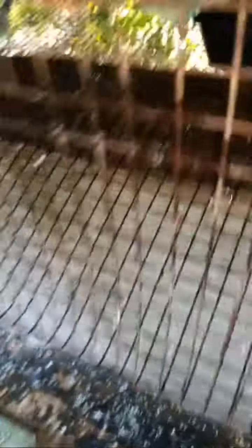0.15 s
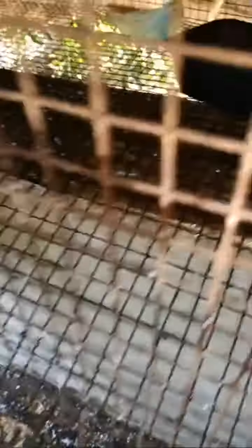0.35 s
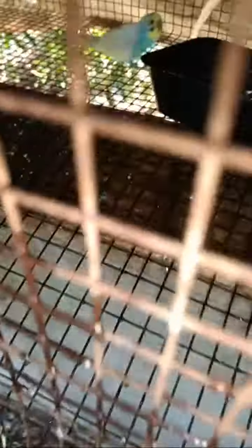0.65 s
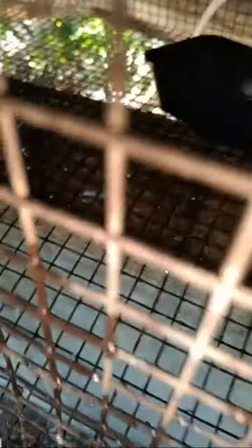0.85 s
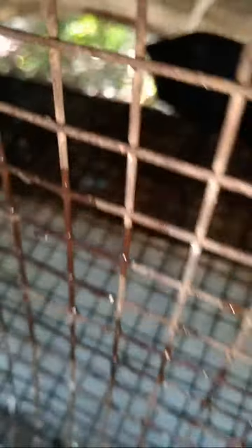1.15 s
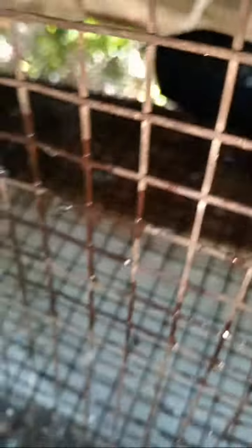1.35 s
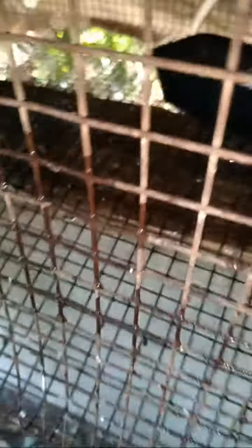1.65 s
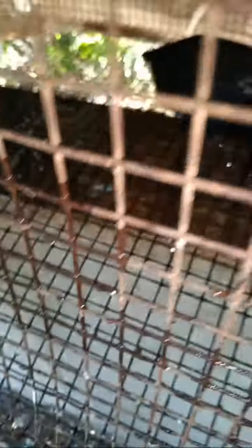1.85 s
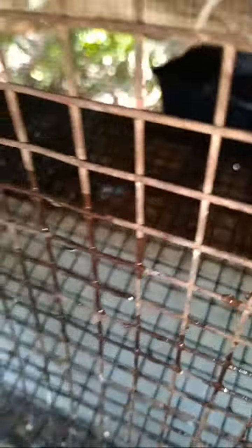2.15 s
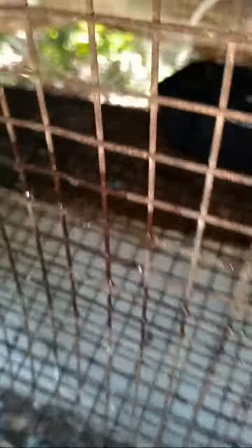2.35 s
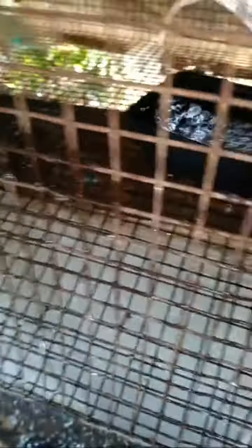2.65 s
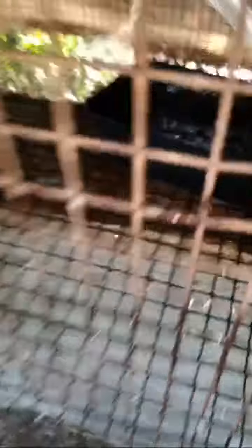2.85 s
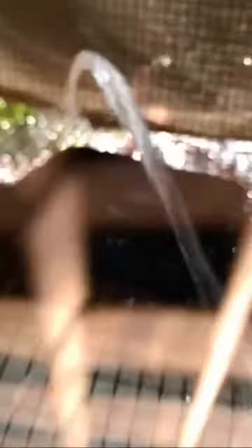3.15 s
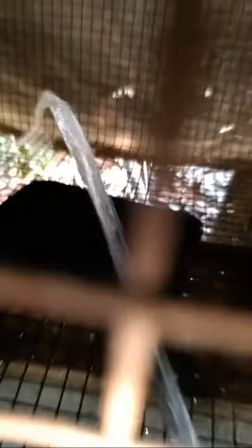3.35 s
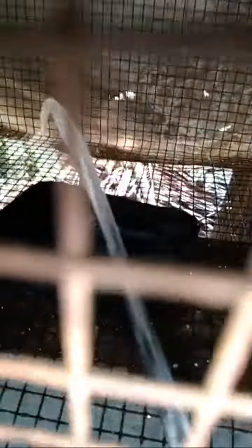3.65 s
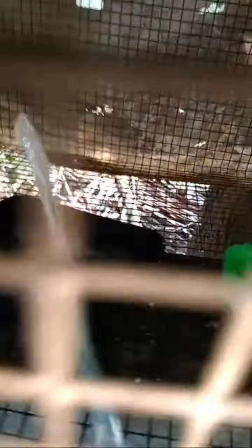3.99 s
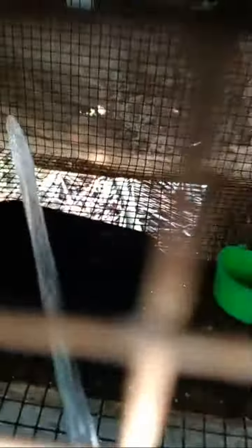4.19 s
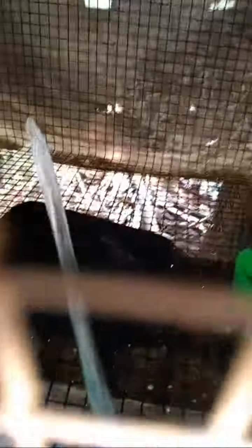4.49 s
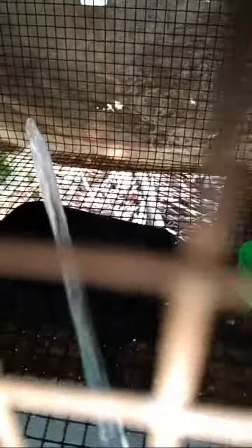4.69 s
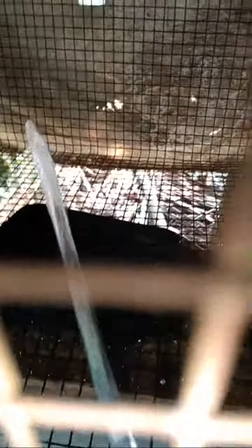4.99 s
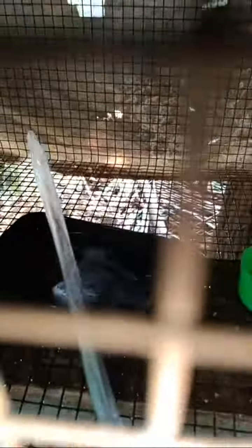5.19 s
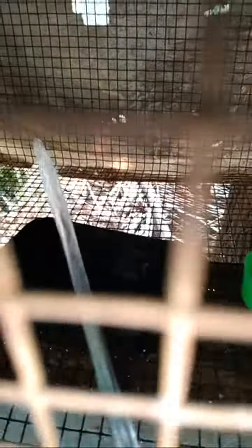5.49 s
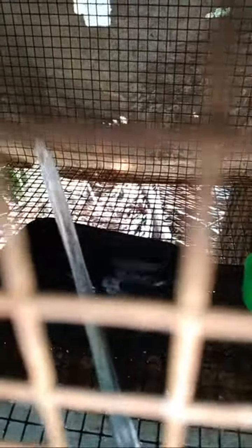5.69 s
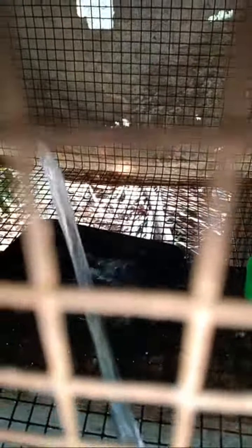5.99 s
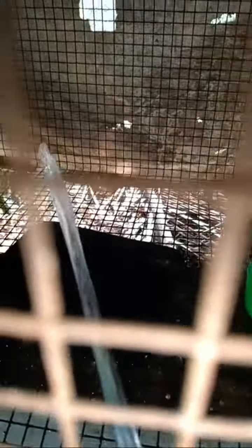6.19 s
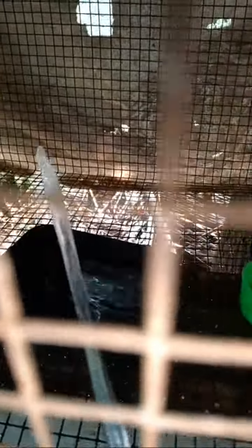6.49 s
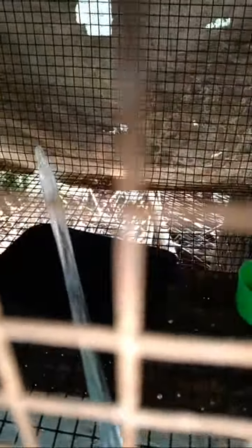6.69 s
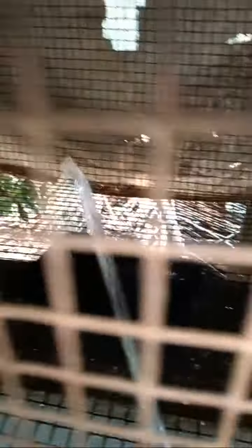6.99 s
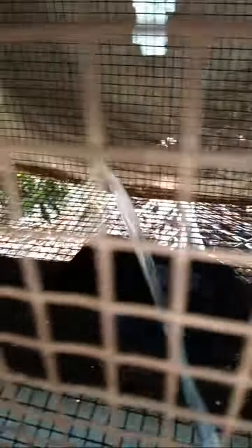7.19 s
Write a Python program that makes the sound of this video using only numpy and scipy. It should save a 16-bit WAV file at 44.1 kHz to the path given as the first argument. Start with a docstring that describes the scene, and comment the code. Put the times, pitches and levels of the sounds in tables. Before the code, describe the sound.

A small wire aviary full of budgerigars. A farther flock warbles continuously in tiny overlapping glides, while close birds whistle short bright chirps and rasp dryly. Water patters and drums quietly beneath, much softer than the birds. Soft cage bumps come around two seconds, a sharper knock just before five. Chirping bursts near one, two and a half and three and a half seconds. Handheld close microphone, short dense reflections, brief tiny dropouts.

```python
"""Farther budgerigars warble without a pause; over them near birds whistle quick glides and scold in dry rasps.
All share a small wire aviary, and a jet of water runs into it, pattering and drumming on tray and tub. Whistles
are pitch-gliding tones, rasps are noise snaps through moving throat resonances. Water is filtered random clicks
plus ringing bubbles; dull thumps are decaying band noise. A faint hum and dry ticks lie underneath; the level
dips for a few milliseconds now and then."""
import sys
import numpy as np
from scipy import signal
from scipy.fft import rfft, irfft, next_fast_len
from scipy.io import wavfile
from scipy.ndimage import uniform_filter1d

SR = 44100
rng = np.random.default_rng(int(sys.argv[2]) if len(sys.argv) > 2 else 0)


def store_wav(level_fs):
    """Save 16-bit WAV to argv[1]."""
    pcm = np.round(np.clip(np.atleast_2d(level_fs), -1, 1) * 32767)
    wavfile.write(sys.argv[1], SR, pcm.T.astype(np.int16))


N = 323694
TIME = np.arange(N) / SR

# Levels in the tables are source settings, ahead of the gains and filters in the functions.
# faint hum: (time [s], level [dB])
HUM_LEVEL = [(0, -61), (.8, -72), (1.3, -63.5), (2.5, -61), (2.7, -101), (7.34, -79.5)]
# sharp ticks: (time [s], level [dB])
TICKS = [(0.771, -29.5), (2.577, -23.5), (3.172, -38), (3.22, -33.5), (3.455, -32), (3.891, -37),
         (3.916, -38), (5.81, -30.5), (6.466, -33)]
# running water: (time [s], drumming level [dB], patter level [dB])
WATER_LEVELS = [(0.0, -63.5, -59), (1.14, -62.5, -60), (1.35, -59, -55.5), (2.25, -51, -53.5),
                (2.41, -53.5, -54), (2.57, -61, -61), (2.88, -78.5, -65.5), (3.27, -68, -64.5),
                (3.66, -78, -65.5), (4.05, -70.5, -65), (4.52, -77.5, -67), (4.78, -68.5, -56.5),
                (5.23, -75, -63), (5.64, -63, -54), (5.99, -78, -68), (7.05, -69.5, -60),
                (7.22, -59.5, -56.5), (7.34, -60, -55)]
# gushes, the jet landing more heavily: (time of peak [s], half length to 1/e of the extra dB [s], extra [dB])
GUSHES = [(3.3, 0.21, 5), (4.552, 0.045, 13), (4.707, 0.03, 13), (5.323, 0.053, 9), (6.698, 0.045, 6.5)]
# dull low thumps, some of them the jet drumming harder on the tub: (time [s], level [dB], rise constant [s],
# t60 [s], lowest [Hz], highest [Hz])
BUMPS = [(.3, -53, .03, 0.44, 60, 200), (1.91, -35, 0.026, 0.42, 90, 430),
         (2.248, -33, 0.016, 0.23, 100, 286), (2.574, -37, 0.0026, 0.02, 30, 3000),
         (3.249, -49, 0.014, 0.23, 60, 170), (4.038, -59.5, 0.04, 1, 80, 200),
         (4.539, -47, 0.043, 0.63, 70, 180), (4.815, -32, 0.001, 0.38, 190, 4000),
         (4.821, -41, 0.0025, 0.49, 167, 238), (6.68, -58, .03, 0.48, 105, 180)]
# farther birds together: (time [s], level [dB], reference pitch [Hz])
FLOCK_CURVE = [(0.0, -38.5, 3230), (0.57, -36, 3473), (1.35, -40, 3226), (2.0, -38, 3460),
               (2.27, -44, 3183), (3.37, -37, 3160), (3.45, -33, 4080), (3.7, -31, 3069), (4.33, -34, 3463),
               (4.46, -39.5, 2630), (4.78, -32.5, 3483), (4.97, -41, 4010), (5.01, -41.5, 2731),
               (5.74, -35.5, 2436), (5.83, -32, 3610), (6.07, -32.5, 2573), (6.54, -36, 3125),
               (6.85, -28, 3365), (7.07, -44.5, 2804), (7.34, -41, 3955)]
# scolding rasps: (time [s], length [s], throat resonance [Hz], its level [dB], shrill level [dB])
RASPS = [(0.019, .1, 4660, -49, -55.5), (0.237, 0.014, 4220, -45, -60), (1.144, 0.076, 4170, -46.5, -60),
         (1.639, 0.058, 5350, -49, -60), (1.825, 0.084, 3780, -33.5, -47), (1.977, .11, 3950, -37.5, -42.5),
         (2.158, 0.053, 3660, -35, -50), (2.22, 0.019, 4400, -29.5, -48), (2.984, 0.048, 3640, -44, -57),
         (3.276, 0.064, 4300, -47, -58), (3.488, 0.041, 3770, -42, -44.5), (4.005, 0.096, 3220, -39, -45),
         (4.108, 0.042, 3860, -59, -43), (4.207, 0.098, 3330, -32, -46), (4.728, 0.05, 3560, -28, -33),
         (4.857, 0.05, 4170, -28, -43.5), (4.919, .028, 4150, -25, -38), (5.312, 0.15, 3260, -50, -56),
         (6.729, 0.085, 3600, -32.5, -50), (6.895, .069, 3430, -37, -37.5),
         (7.002, 0.034, 4070, -37.5, -52), (7.2, 0.037, 3250, -42.5, -44)]
# throat modes of a rasp: (multiple of the resonance [ratio], nominal width [Hz], level [dB])
THROAT_MODES = [(.62, 420, -5), (.84, 503, -1.5), (1.018, 520, 2), (1.17, 610, -11)]
# shrill modes of a rasp: (centre [Hz], nominal width [Hz], level [dB])
SHRILL_MODES = [(5880, 1700, -7.5), (6820, 210, 6), (8410, 630, -5), (9700, 620, -22.5)]
# near whistled syllables: (time [s], length [s], pitch [Hz], glide [octaves], level [dB])
CHIRPS = [(0.103, 0.04, 3300, -.6, -35), (0.266, 0.081, 3588, 0.07, -29), (0.333, 0.049, 3250, -.45, -38),
          (0.437, 0.031, 3710, -0.21, -30.5), (.46, 0.067, 2650, -0.32, -37.5),
          (0.527, 0.055, 2920, 0.12, -35), (0.572, 0.067, 3600, -.05, -29),
          (0.708, 0.035, 3860, -0.28, -33.5), (.759, 0.037, 3040, -0.47, -25),
          (.803, 0.039, 2797, 0.56, -28), (0.927, 0.024, 4620, 0.29, -23.5),
          (0.949, 0.017, 3780, -0.22, -17.5), (0.973, 0.017, 2810, -0.5, -22.5),
          (1.003, 0.027, 3633, -0.15, -13.5), (1.028, 0.015, 3950, 0.28, -21.5),
          (1.039, .014, 2600, -1.55, -30.5), (1.331, 0.022, 3380, 0, -38.5),
          (1.479, 0.034, 3375, 0.12, -30.5), (1.557, 0.04, 3292, -0.026, -26),
          (1.591, 0.029, 2890, 0.37, -37.5), (1.803, 0.012, 3887, -0.028, -26.5),
          (1.935, 0.02, 2950, -.4, -32.5), (1.97, 0.071, 3530, 0.58, -30),
          (2.226, 0.045, 1880, -0.025, -39.5), (2.248, 0.076, 4000, .25, -41),
          (2.497, 0.037, 3150, -0.09, -36.5), (2.532, .02, 3282, 0, -22.5),
          (2.559, 0.017, 4400, 0.44, -27.5), (2.574, 0.036, 3150, -1.2, -21.5),
          (2.596, 0.025, 3230, 0.23, -21.5), (2.624, 0.031, 3637, 0.045, -15.5),
          (2.653, 0.017, 2700, -1.4, -26), (2.742, 0.11, 2580, -0.59, -40), (2.9, 0.055, 3320, 0.8, -37),
          (2.96, 0.019, 3506, -0.057, -24.5), (3.092, 0.042, 4520, -0.026, -35),
          (3.148, 0.058, 2975, -1.05, -33), (3.216, 0.023, 2586, 0.51, -32.5),
          (3.317, 0.047, 3155, -0.13, -37), (3.453, 0.013, 4600, 0.61, -23),
          (3.46, 0.046, 3594, -0.82, -19.5), (3.462, 0.036, 3793, -0.091, -18.5),
          (3.513, 0.016, 3790, 0, -16.5), (3.514, 0.025, 2170, 0.042, -27.5),
          (3.535, 0.0068, 3755, 0.21, -10.5), (3.55, 0.041, 3970, -0.2, -20.5),
          (3.557, 0.036, 3190, 0.36, -21.5), (3.579, 0.022, 3580, 0, -16), (3.58, .12, 2200, 0.008, -36.5),
          (3.603, .02, 3960, -.05, -14), (3.628, 0.036, 3790, -0.14, -23), (3.665, .087, 3140, 0, -30.5),
          (3.701, 0.028, 3990, .4, -30), (3.748, 0.14, 3640, -0.17, -36), (3.751, 0.059, 2936, 0.13, -32.5),
          (3.809, 0.12, 3080, 0.12, -30.5), (3.886, 0.089, 2322, -0.039, -33),
          (3.902, 0.15, 3130, 0.095, -31.5), (3.94, 0.077, 2820, -0.32, -29),
          (4.036, 0.022, 3126, 0.039, -22.5), (4.044, .089, 2082, -0.56, -40.5),
          (4.131, 0.063, 2695, -0.61, -37), (4.203, 0.009, 4240, 0.72, -28),
          (4.216, 0.022, 3838, -.05, -15), (4.236, 0.029, 2840, 0, -29.5),
          (4.274, 0.035, 3855, 0.14, -18.5), (4.302, 0.039, 2295, -1.73, -30),
          (4.334, 0.044, 2920, .35, -26), (4.373, 0.038, 3132, 0.16, -22),
          (4.401, 0.046, 2480, 0.41, -32.5), (4.44, 0.086, 2060, 0.12, -35),
          (4.521, 0.049, 3126, 0.12, -27), (4.569, 0.038, 2616, -0.18, -31),
          (4.59, 0.049, 3167, 0.18, -23.5), (4.641, 0.019, 3210, 0.046, -20.5),
          (4.661, 0.045, 2520, -0.62, -31), (4.773, 0.06, 2560, -0.59, -34.5),
          (5.002, 0.034, 2587, -.15, -38), (5.134, 0.091, 2680, -0.42, -42),
          (5.19, 0.083, 2365, 0.027, -38.5), (5.284, 0.083, 3440, 0.27, -45.5),
          (5.381, 0.088, 2390, -0.81, -35), (5.492, 0.02, 3310, 0.2, -38), (5.491, 0.023, 1663, 0, -32),
          (5.521, 0.021, 2425, -0.51, -33.5), (5.558, 0.076, 2315, -0.3, -35),
          (5.619, 0.086, 2303, -0.88, -32.5), (5.718, 0.043, 2410, 0.32, -27.5),
          (5.763, 0.065, 2053, -.6, -31), (5.778, 0.055, 3653, -0.021, -25.5),
          (5.834, 0.046, 3900, .05, -30.5), (5.849, 0.06, 2874, 0.11, -32.5),
          (5.896, 0.053, 3686, -0.035, -28), (5.915, .03, 2275, 0.24, -29),
          (5.951, 0.023, 3010, -0.31, -26.5), (5.971, 0.049, 2434, -0.15, -20.5),
          (6.015, 0.052, 3250, .5, -26), (6.055, 0.051, 2390, -0.58, -23.5),
          (6.133, 0.061, 3347, -0.31, -29.5), (6.178, 0.052, 3400, 0.41, -32),
          (6.217, 0.016, 2230, -.4, -23), (6.233, .056, 2730, -0.55, -26),
          (6.24, 0.073, 3670, -0.33, -33.5), (6.281, 0.055, 2253, -0.28, -24.5),
          (6.298, 0.079, 3755, -0.23, -27.5), (6.306, 0.075, 2980, 0.28, -34),
          (6.341, 0.076, 2240, -0.7, -28), (6.39, 0.046, 3814, -0.14, -33.5),
          (6.548, 0.032, 4560, 0.27, -35), (6.594, 0.038, 3750, -0.35, -28),
          (6.697, 0.056, 3065, 0.33, -28), (6.711, 0.044, 3725, 0.07, -31), (6.762, 0.041, 2507, 0.32, -25),
          (6.764, 0.033, 3640, 0.26, -25), (6.817, 0.042, 3380, -0.022, -22.5),
          (6.835, 0.053, 2875, 0, -29), (6.948, 0.025, 2500, 0.52, -26.5),
          (6.979, 0.025, 3595, 0.054, -26.5), (7.008, 0.034, 3215, 0.23, -32.5),
          (7.314, 0.029, 4080, 0.37, -31.5)]
# first echoes from tray, tub and walls: (mean delay [s], level [dB])
ECHOES = [(.0023, -3.5), (.0041, -16), (.0067, -20.5), (.0094, -20.5), (0.0126, -20.5)]
# brief level dips: (time of centre [s], length [s])
DIPS = [(.096, 0.0026), (0.774, .005), (1.096, 0.0047), (1.878, 0.014), (2.077, .01), (2.554, 0.0056),
        (5.355, 0.0059), (6.437, 0.013), (7.154, 0.0069)]
# spectrum of water drumming on the tub: (frequency [Hz], level [dB])
DRUMMING_SPECTRUM = [(25, -33.5), (60, -16.5), (120, -1), (240, 0), (320, 1.5), (430, 3), (650, -20),
                     (1000, -28.5), (2000, -67)]
# spectrum of water pattering on the tray: (frequency [Hz], level [dB])
PATTER_SPECTRUM = [(300, -30.5), (550, -5.5), (800, -1.5), (1100, 4), (1600, 6), (3000, -5), (6000, -10.5),
                   (10000, -29.5), (16000, -30)]
# spectrum of fine spray, also of the air hiss in rasps: (frequency [Hz], level [dB])
SPRAY_SPECTRUM = [(1500, -18.5), (4000, 12.5), (7000, 13), (8600, 8), (10000, 0), (11500, -6.5), (13000, 2),
                  (16000, 0)]
# spectrum of a bump on the cage: (frequency [Hz], level [dB])
THUMP_SPECTRUM = [(30, -12.5), (220, -9), (400, -5), (800, -5.5), (1400, -5), (2200, -15), (5000, -38),
                  (16000, -59)]
# spectrum of the throat part of a rasp: (frequency [Hz], level [dB])
RASP_BRIGHT_SPECTRUM = [(700, -31), (1500, -12), (2200, 0.5), (5000, 3), (6200, 8), (9000, -23),
                        (11500, -19), (16000, -15)]
# spectrum of the shrill part of a rasp: (frequency [Hz], level [dB])
RASP_SHRILL_SPECTRUM = [(2000, -36), (5500, 3), (8800, 0.5), (11500, 1.5), (13000, -1.5), (16000, 0)]
# spectrum a beak gives to whistles: (frequency [Hz], level [dB])
BEAK_SPECTRUM = [(500, -60.5), (1100, -5.5), (1700, -1), (4200, 0.5), (5500, -6.5), (7000, -18), (8400, -4),
                 (10000, -15), (12000, -17.5), (16000, -16.5)]


def gain_of(db):
    """Decibels to amplitude."""
    return 10 ** (np.asarray(db) / 20)


def evened(x):
    """Scales to rms 1."""
    return x / np.sqrt(np.mean(x ** 2) + 1e-20)


def follow(table, t, axis):
    """One column of a curve, interpolated at the times t."""
    rows = np.array(table)
    return np.interp(t, rows[:, 0], rows[:, axis])


def add(mix, s, sound):
    """Mixes a sound in at the time s."""
    part = mix[max(round(s * SR), 0):][:len(sound)]
    part += sound[:len(part)]


def samples_around(s, length_s, edge_s):
    """Sample numbers of an event, with room for its edges."""
    return np.arange(max(int((s - edge_s) * SR), 0), min(int((s + length_s + edge_s) * SR), N))


def coloured(x, spectrum):
    """Filters by a spectrum, interpolated in dB over log frequency."""
    hz, db = np.transpose(spectrum)
    size = next_fast_len(len(x) + 512)
    bins_hz = np.fft.rfftfreq(size, 1 / SR)
    gain = gain_of(np.interp(np.log(bins_hz + 1), np.log(hz), db))
    return irfft(rfft(x, size) * gain, size)[:len(x)]


def wander(rate_hz):
    """Smooth random curve of rms 1: noise that rolls off steeply around rate_hz."""
    size = next_fast_len(N)
    bins_hz = np.fft.rfftfreq(size, 1 / SR)
    spectrum = rfft(rng.standard_normal(size)) / (1 + (bins_hz / rate_hz) ** 4)
    return evened(irfft(spectrum, size)[:N])


def clicks(per_s, spread_db, hiss):
    """Random clicks of uneven size over a share of smooth noise."""
    size = gain_of(spread_db * np.minimum(rng.exponential(1, N), 4)) * rng.choice([-1, 1], N)
    sparse = evened(size * (rng.random(N) < per_s / SR))
    return evened(sparse + hiss * rng.standard_normal(N))


def swell(t, length_s, edge_s):
    """Opens around t = 0 and shuts around t = length_s."""
    opening = np.clip(np.minimum(t, length_s - t) / edge_s + .5, 0, 1)
    return np.sin(np.pi / 2 * opening) ** 2


def hum(centre_hz=237):
    """A low sine whose pitch wavers slightly."""
    hz = centre_hz + 3.4 * wander(12.0)
    return evened(np.sin(2 * np.pi * np.cumsum(hz) / SR)) * gain_of(follow(HUM_LEVEL, TIME, axis=1))


def bubbles(per_s, count=24):
    """Trapped bubbles ring for a few cycles, rise a little in pitch and die out, small ones faster."""
    out, t = np.zeros(N), TIME[:2000]
    for hz in np.geomspace(420, 1500, count):
        tone = np.sin(2 * np.pi * hz * t * (1 + 3 * t))
        ring = tone * np.exp(-hz * t / 7) * (1 - np.exp(-hz * t))
        for when, size in rng.random((int(per_s * TIME[-1] / count), 2)):
            add(out, when * TIME[-1], gain_of(6.5 * size) * ring)
    return evened(out)


def water(gush_db=3.2, drumming_db=1.5, patter_db=-1.5, spray_db=-57.5):
    """Drops drum on the tub, patter and gurgle on the tray and break up into fine spray."""
    drumming = evened(coloured(clicks(250, 0.87, 0.98), DRUMMING_SPECTRUM))
    drumming *= gain_of(follow(WATER_LEVELS, TIME, axis=1) + drumming_db)
    patter = evened(coloured(clicks(500, 4.5, 1.0), PATTER_SPECTRUM))
    splash = gain_of(4.5) * patter + gain_of(-4.5) * bubbles(per_s=100)
    splash *= gain_of(follow(WATER_LEVELS, TIME, axis=2) + patter_db)
    spray = evened(coloured(clicks(1500, 6.6, 1.8), SPRAY_SPECTRUM)) * gain_of(spray_db)
    lumps = gain_of(gush_db * wander(20))  # the jet lands in uneven lumps
    surge = gain_of(sum(db * np.exp(-((TIME - s) / half_s) ** 2) for s, half_s, db in GUSHES))
    return surge * (drumming + lumps * splash) + np.sqrt(lumps) * spray


def ticks(decay_s=.00005):
    """Dry clicks that decay within a fraction of a millisecond."""
    out = np.zeros(N)
    for s, db in TICKS:
        add(out, s, gain_of(db + 8.5) * np.exp(-TIME[:100] / decay_s))
    return out


def bumps():
    """A dull thump, such as the jet drumming harder on the tub: decaying band noise without a clear ring."""
    out, t = np.zeros(N), TIME[:SR // 2]
    for s, db, rise_s, t60_s, low_hz, high_hz in BUMPS:
        band = signal.butter(3, [low_hz, high_hz], "band", fs=SR, output="sos")
        shake = signal.sosfilt(band, coloured(rng.standard_normal(len(t)), THUMP_SPECTRUM))
        envelope = gain_of(db - 60 * t / t60_s) * (1 - np.exp(-t / rise_s))
        add(out, s, evened(shake) * envelope)
    return out


def whistles(rows, jitter_hz, trill_hz, trill_rate_hz, flutter_db, second_db, third_db, edge_s):
    """The syrinx glides through three pitches; roughness scales the fast trill, jitter and flutter."""
    out, jitter, flutter = np.zeros(N), wander(328), wander(230)
    chances = rng.random((len(rows), 2))
    for row, (phase, speed) in zip(rows, chances):
        s, length_s, first_hz, middle_hz, last_hz, early_db, late_db, rough = row
        at = samples_around(s, length_s, edge_s)
        t, rough = TIME[at] - s, np.clip(rough, 0, 1)
        u = np.clip(t / length_s, -.2, 1.2)
        bend_hz = (2 * middle_hz - first_hz - last_hz) * 2 * u * (1 - u)
        hz = first_hz + (last_hz - first_hz) * u + bend_hz
        # each trill runs at 0.5-1.5 times trill_rate_hz
        trill = np.sin(2 * np.pi * (trill_rate_hz * (.5 + speed) * t + phase))
        shaken_hz = hz + rough * (jitter_hz * jitter[at] + trill_hz * trill)
        turn = 2 * np.pi * np.cumsum(shaken_hz) / SR
        tone = np.sin(turn) + gain_of(second_db) * np.sin(2 * turn) + gain_of(third_db) * np.sin(3 * turn)
        # the blowing pressure arches over the syllable
        arch_db = 3 * (np.sin(np.pi * u) - .7)
        level_db = early_db + (late_db - early_db) * np.clip(2 * u - .5, 0, 1) + arch_db
        fluttering = evened(tone * gain_of(flutter_db * rough * flutter[at]))
        out[at] += fluttering * gain_of(level_db) * swell(t, length_s, edge_s)
    return out


def flock(count=560):
    """Very short random glides, mostly falling, scattered round the flock's reference pitch."""
    when, long, pitch, slope, arch, loud, rough = rng.random((count, 7)).T
    s = (np.arange(count) + when) / count * (TIME[-1] - .02)
    length_s = 0.00963 + 0.0242 * long
    hz = follow(FLOCK_CURVE, s, axis=2) * 2 ** (1.2 * (pitch - .63))
    glide, bend = 0.2082 * (slope - .62), 0.1233 * (arch - .4)
    first_hz, middle_hz, last_hz = hz * (1 - glide), hz * (1 + bend), hz * (1 + glide)
    db = 11 * loud
    rows = np.transpose([s, length_s, first_hz, middle_hz, last_hz, db, db, 0.4 + 0.65 * rough])
    voices = whistles(rows, jitter_hz=226.4, trill_hz=200, trill_rate_hz=219, flutter_db=3,
                      second_db=-7, third_db=-12.5, edge_s=.006)
    return evened(coloured(voices, BEAK_SPECTRUM)) * gain_of(follow(FLOCK_CURVE, TIME, axis=1) - 4.0)


def resonate(x, hz, width_hz):
    """A one-pole resonance that follows the curve hz, by shifting it to 0 Hz and back."""
    turn = np.exp(2j * np.pi * np.cumsum(hz) / SR)
    r = np.exp(-np.pi * width_hz / SR)
    return 2 * (turn * signal.lfilter([1 - r], [1, -r], x / turn)).real


def throat_mode(x, hz, width_hz):
    """Two resonances in series, for steep sides."""
    return resonate(resonate(x, hz, 0.97 * width_hz), hz, 1.32 * width_hz)


def rasps(edge_s=0.013, drift=0.1):
    """Uneven snaps of the syrinx, each with a puff of air, ring a throat that keeps changing shape."""
    turns = np.cumsum(330 * np.exp(0.26 * wander(150))) / SR  # snaps at about 330 Hz
    puffs = 0.35 + np.exp(-(turns % 1) / 0.39)
    drive = puffs * rng.standard_normal(N) * gain_of(1.14 * wander(60))
    throat, beak = 1 + drift * wander(24), 1 + 0.049 * wander(20)
    bright, shrill = np.zeros(N), np.zeros(N)
    air = coloured(drive, SPRAY_SPECTRUM)  # thin, wide hiss
    for s, length_s, hz, bright_db, shrill_db in RASPS:
        at = samples_around(s, length_s, edge_s)
        t = TIME[at] - s
        shape = swell(t, length_s, edge_s) * gain_of(4.1 * (np.sin(np.pi * t / length_s) - 0.86))
        low = sum(gain_of(db) * throat_mode(drive[at], hz * ratio * throat[at], width_hz)
                  for ratio, width_hz, db in THROAT_MODES)
        high = sum(gain_of(db) * throat_mode(drive[at], mode_hz * beak[at], width_hz)
                   for mode_hz, width_hz, db in SHRILL_MODES)
        bright[at] += gain_of(bright_db) * shape * evened(low)
        shrill[at] += gain_of(shrill_db) * shape * (evened(high) + gain_of(-4.5) * evened(air[at]))
    bright = coloured(bright, RASP_BRIGHT_SPECTRUM)
    shrill = coloured(shrill, RASP_SHRILL_SPECTRUM)
    return gain_of(2.0) * bright + gain_of(3.5) * shrill


def syllables(db_per_octave=6, bow_octaves=.02):
    """Pitch bows by chance, the high end of a glide is louder, long or wide glides are rougher."""
    s, length_s, hz, glide, db = np.transpose(CHIRPS)
    bow = bow_octaves * rng.uniform(-0.95, 1, len(s))
    first_hz = hz * 2 ** (-glide / 2 - bow)
    middle_hz = hz * 2 ** (bow / 2)
    last_hz = hz * 2 ** (glide / 2 - bow)
    lean_db = db_per_octave * glide / 2
    # roughness per second of length, up to a limit, plus roughness per octave of glide
    rough = np.minimum(9.4 * length_s, 0.44) + 0.52 * abs(glide)
    return np.transpose([s, length_s, first_hz, middle_hz, last_hz, db - lean_db, db + lean_db, rough])


def near_birds(husk_db=-21):
    """Close chirps, with a faint husky spread of sound around each whistle."""
    voice = whistles(syllables(), jitter_hz=170.0, trill_hz=146, trill_rate_hz=200, flutter_db=5.5,
                     second_db=-20.5, third_db=-33.5, edge_s=0.0054)
    husk = gain_of(husk_db) * voice * wander(1440)
    return gain_of(-2.0) * coloured(voice + husk, BEAK_SPECTRUM)


def nearby_walls(x, sway_s=0.00017):
    """Echoes beat against each glide and break it into pulses; their paths shift as the birds move."""
    out = x.copy()
    for delay_s, db in ECHOES:
        path_s = delay_s + sway_s * wander(1.98)
        out += gain_of(db) * np.interp(TIME - path_s, TIME, x)
    return out


def aviary(x, t60_s, size=13230):
    """Close walls and the roof return a short, dense scatter of echoes."""
    t = TIME[:size]
    scatter = rng.standard_normal(size) * (rng.random(size) < 2500 / SR)
    taps = scatter * (t > .003) * gain_of(-60 * t / t60_s)
    return signal.oaconvolve(x, taps / np.linalg.norm(taps))[:N]


def scene():
    """Mixes all sources; far birds get more and longer echo than near ones."""
    near, far = nearby_walls(near_birds()) + rasps(), flock()
    near_in_room = near + gain_of(-8.0) * aviary(near, t60_s=0.14)
    far_in_room = gain_of(-0.5) * far + gain_of(-5.5) * aviary(far, t60_s=0.62)
    return (hum() + water() + ticks() + bumps() + far_in_room + near_in_room)[None]


def record(dry, dip_db=-27, edge_hz=15900):
    """The level dips for a few milliseconds now and then; a steep low-pass sets the band limit."""
    shut = np.zeros(N)
    for s, length_s in DIPS:
        shut[abs(TIME - s) < length_s / 2] = 1
    heard = dry * gain_of(dip_db * uniform_filter1d(shut, size=30))
    low_pass = signal.firwin(511, edge_hz, window=("kaiser", 9), fs=SR)
    return signal.oaconvolve(heard, low_pass[None], "same")


dry = scene()
out = record(dry)
store_wav(out)
```